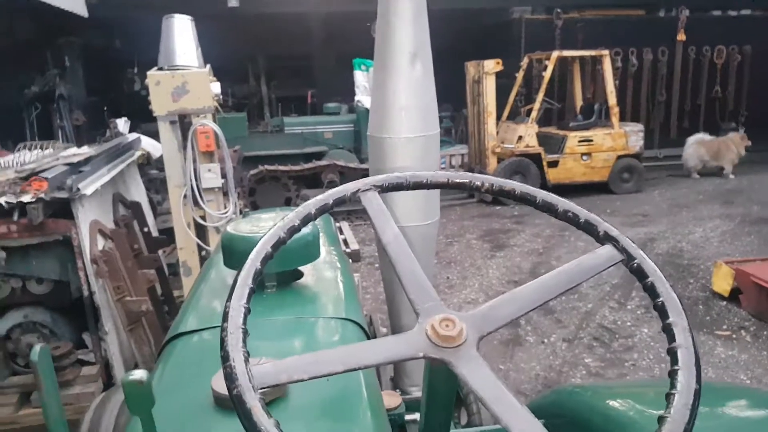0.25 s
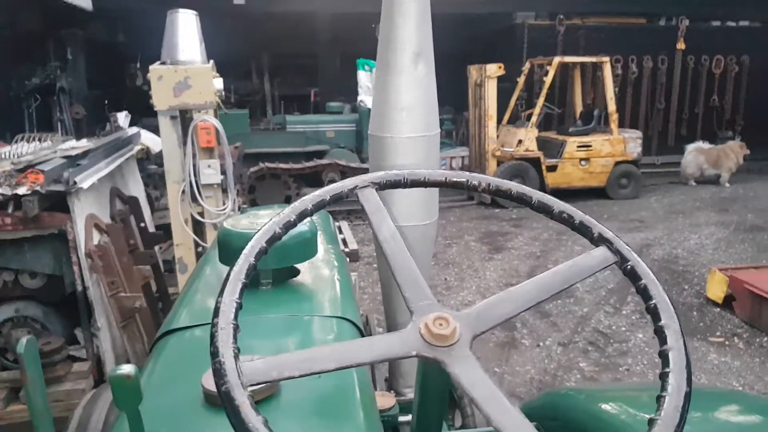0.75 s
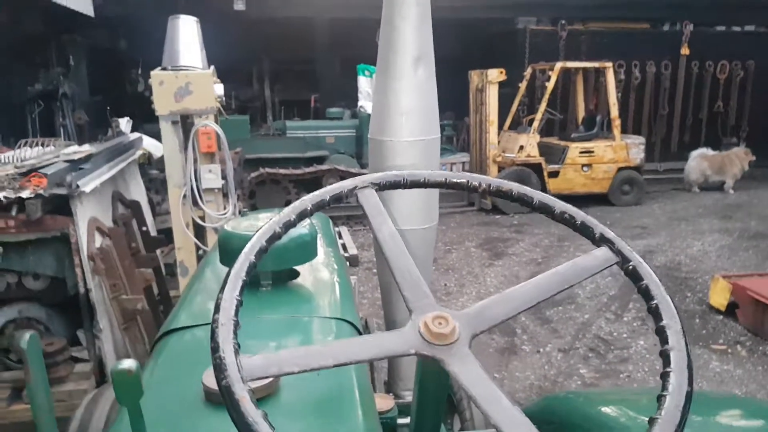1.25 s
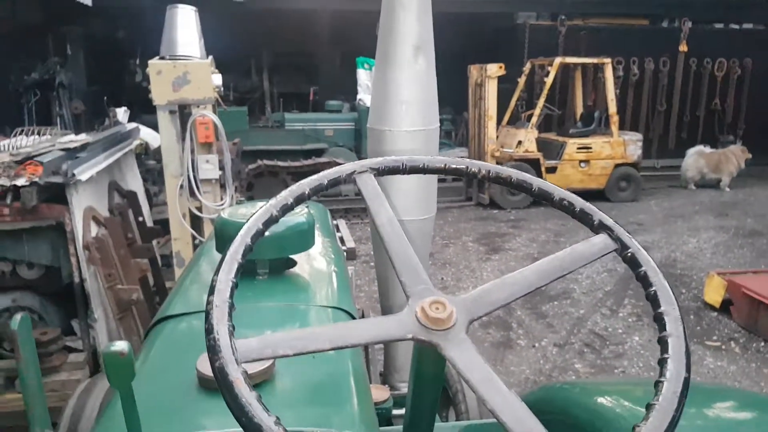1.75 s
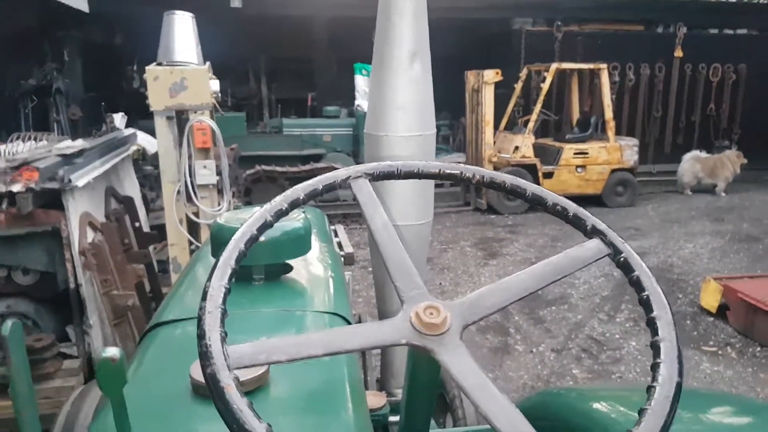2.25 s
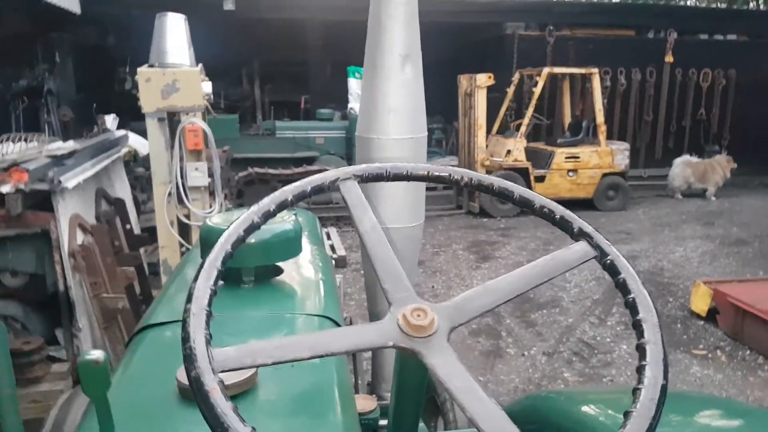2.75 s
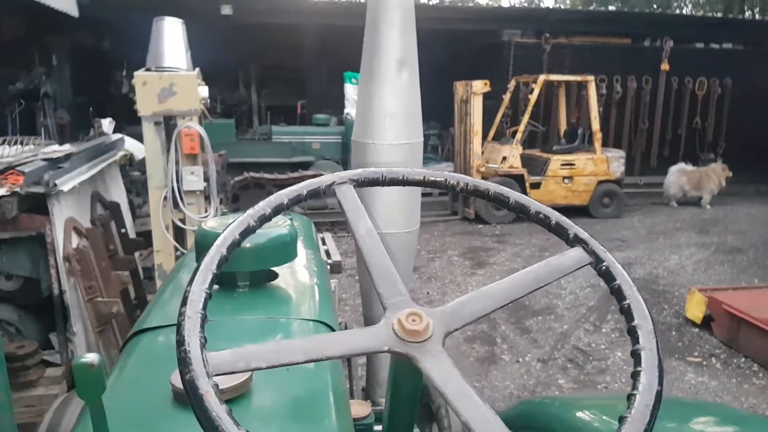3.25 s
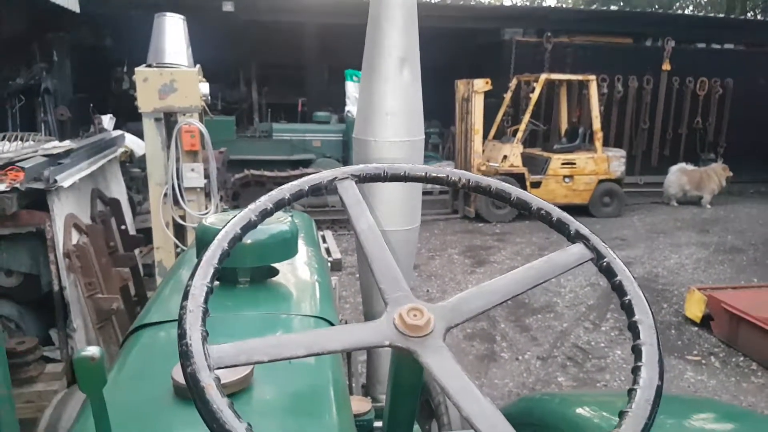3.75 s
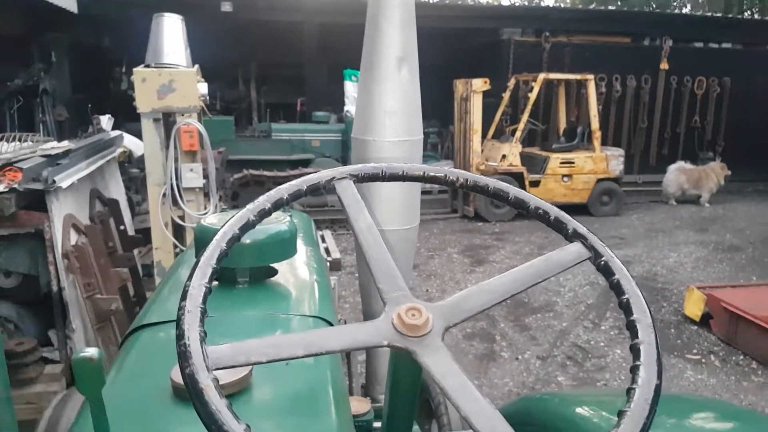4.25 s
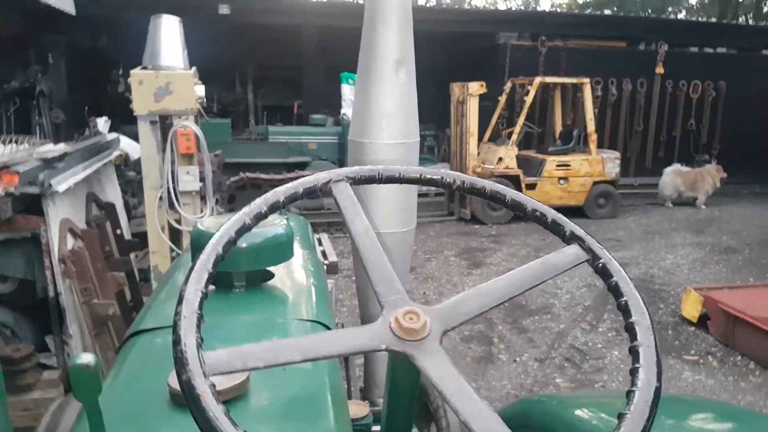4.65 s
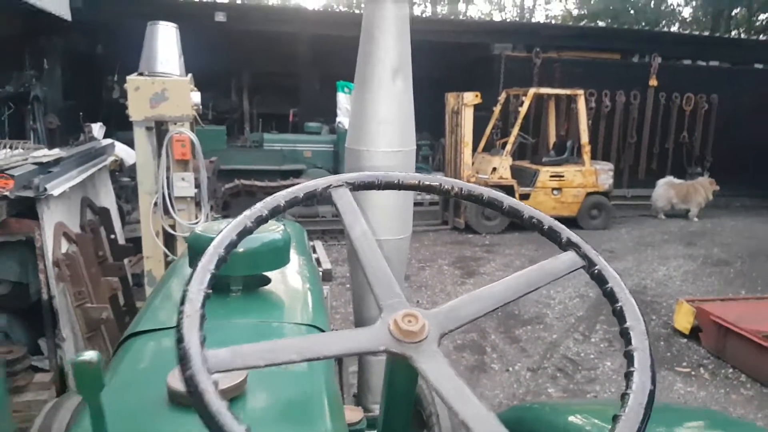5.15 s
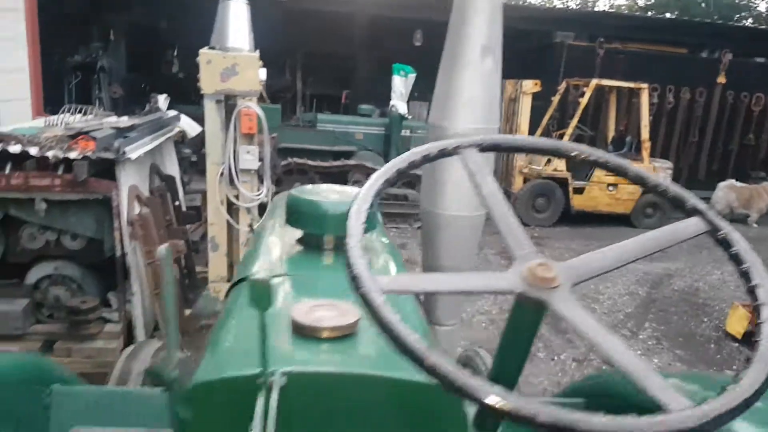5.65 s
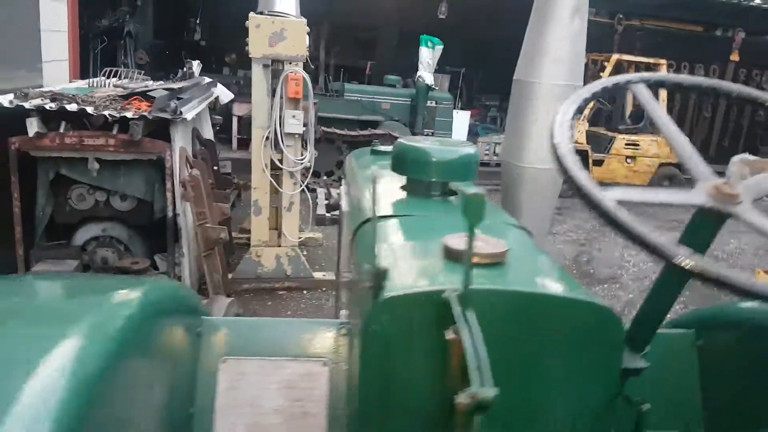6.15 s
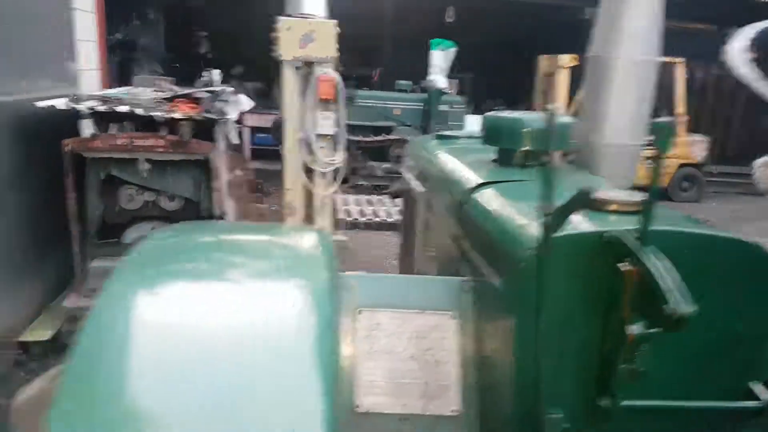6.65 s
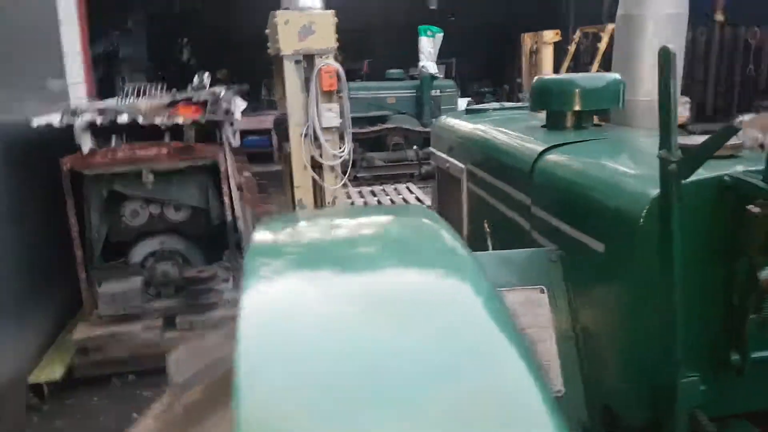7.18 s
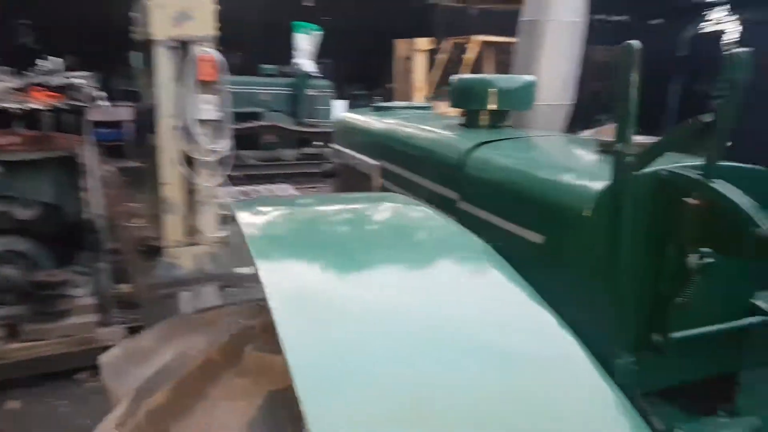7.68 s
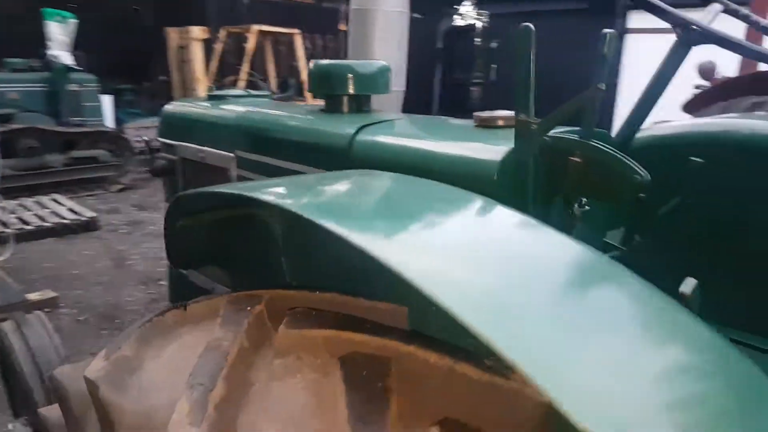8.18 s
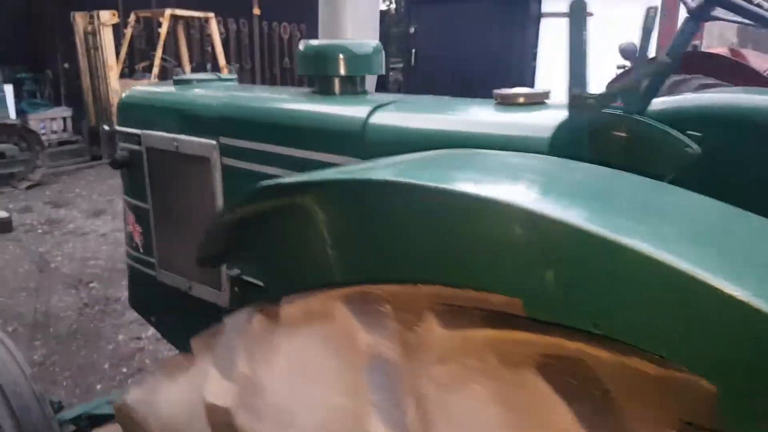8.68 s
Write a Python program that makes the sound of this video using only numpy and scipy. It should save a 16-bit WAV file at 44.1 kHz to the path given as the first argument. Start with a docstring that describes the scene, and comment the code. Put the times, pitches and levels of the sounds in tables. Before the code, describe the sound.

Rapid, even chugging from a big one-cylinder diesel engine at close range: low thuds from the exhaust stack, woody metallic knocks, clatter and pulsing hiss over a low yard rumble. The pace creeps up very slightly. Occasional tiny rattles of loose metal flick past. After about five seconds the handheld stereo viewpoint moves from the driver's seat down to the rear wheel, and the sound turns fuller, with more panel drumming and altered knocks.

```python
"""Dull thuds about eight times a second are heard first: a single-cylinder two-stroke diesel tractor ticks over.
Each firing sends swelling and dying tones up the stack, which return from the walls and sheds of a yard.
Higher tones knock at set delays, loose metal pings and rattles, and filtered noise makes the gas rush and hiss.
Noise also drums the engine's flank and rumbles in the yard. The engine slowly gains speed while the listener
starts at the seat and steps down beside the rear wheel."""
import sys
import numpy as np
from scipy import signal
from scipy.fft import rfft, irfft
from scipy.io import wavfile

SR = 44100
rng = np.random.default_rng(int(sys.argv[2]) if len(sys.argv) > 2 else 0)


def bounce(signal):
    """Save signal as a 16-bit WAV file at the path given by the first command-line argument."""
    frames = np.transpose(np.atleast_2d(signal))
    limited = np.clip(frames, -1, 1)
    pcm = np.round(limited * 32767).astype(np.int16)
    wavfile.write(sys.argv[1], SR, pcm)


N = 393372

# Times when the listener is at each of four places: [t/s]
PLACES_S = [1.2, 4.0, 6.5, 8.2]


def from_db(db):
    """Amplitude ratio: twenty decibels are a factor of ten."""
    return 10 ** (np.asarray(db) / 20)


def at_hz(points, hz):
    """Spectral interpolation: the second column is read linearly against log frequency."""
    points = np.array(points)
    return np.interp(np.log(hz), np.log(points[:, 0]), points[:, 1])


def bin_hz():
    """Discrete Fourier frequencies in Hz, kept at 1 Hz or more for the logarithm."""
    return np.maximum(np.arange(N // 2 + 1) * SR / N, 1)


def drift(rate_hz):
    """Low-pass random process: two equal poles smooth white noise, scaled to spread 1."""
    pole = np.exp(-2 * np.pi * rate_hz / SR)
    smooth = signal.lfilter([1], [1, -2 * pole, pole * pole], rng.standard_normal(N + SR))
    smooth = smooth[SR:]  # drop the filter's start
    return smooth / smooth.std()


def crank():
    """Kinematics: crank speed integrates to an angle in degrees, and each whole turn fires once."""
    # Crank speed: [t/s, speed/(turns per minute)]
    speed = [(0, 480.83), (2, 487.66), (4, 495.71), (6, 503.31), (7.4, 510.0), (9, 509.37)]
    start_turn = .027  # part of a turn since the last firing at time zero
    lead = SR // 10
    t = np.arange(-lead, N + lead) / SR
    turns = np.cumsum(np.interp(t, *np.transpose(speed))) / 60 / SR
    turns = turns - turns[lead] + start_turn
    fired = np.interp(np.arange(int(turns[-1]) + 1), turns, t)
    return 360 * turns[lead:lead + N], fired


def gas(colour, gate_db):
    """Turbulence noise: a gate sets its strength, a spectrum its colour; partly coherent pair, rms 1."""
    # Left-right correlation: [f/Hz, correlation]
    likeness = [(60, 0.91), (130, 0.99), (290, 0.87), (640, 0.9), (1400, 0.067), (3100, 0.074), (6800, .12),
                (15000, 0.055)]
    mid, side = rfft(rng.standard_normal((2, N)) * from_db(gate_db))
    alike = np.clip(at_hz(likeness, bin_hz()), 0, 1)
    pair = np.sqrt(1 + alike) * mid + np.sqrt(1 - alike) * side * [[1], [-1]]
    out = irfft(pair * colour, N)
    return out / out.std()


def yard_rumble():
    """Broadband background: low-frequency noise with a slight random modulation."""
    # Rumble spectrum: [f/Hz, relative level/dB]
    rumble_spectrum = [(15, -59.5), (30, -22.5), (50, -9), (110, -6), (160, 3), (250, 4.5), (330, 1.5),
                       (450, -1), (800, -28), (3000, -110)]
    return gas(from_db(at_hz(rumble_spectrum, bin_hz())), 0.85 * drift(32))


def port_flow(degrees):
    """Periodic flow: crank angle sets the relative strength of rush and hiss in dB."""
    # Gas flow over one turn: [crank angle from firing/degrees, rush level/dB, hiss level/dB]
    port_gates = [(-175, -9.5, -2), (-152, -6, -1.5), (-144, -7, 2.5), (-120, -3, 0.5), (-92, -2, 3),
                  (-78, -3, 2), (-39.5, -3.5, 2.5), (-25, -4, 4), (20, -6.5, 1), (54, -7, 1),
                  (84, -7.5, -1.5), (139, -8.5, -4), (159, -11, -2.5)]
    angle, rush_db, hiss_db = np.transpose(port_gates)
    return [np.interp(degrees, angle, column, period=360) for column in (rush_db, hiss_db)]


def top_hiss(degrees, blow_db, gusts, lumps):
    """Amplitude-modulated noise: a thin treble hiss follows the crank angle and the eddies."""
    # Top hiss spectrum: [f/Hz, relative level/dB]
    top_spectrum = [(4100, -70), (7100, -40), (8700, -12), (9250, -7), (10100, -5), (10850, -1),
                    (11700, -4), (12700, 0), (13400, -3), (14400, -1), (16100, -2)]
    # Top hiss over one turn: [crank angle from firing/degrees, relative level/dB]
    top_gates = [(-175, -5), (-150, -3), (-140, 0), (-95, -1), (-62, 1.5), (-35, -1), (55, -2), (80, -7),
                 (135, -7), (162, -3)]
    gate_db = np.interp(degrees, *np.transpose(top_gates), period=360)
    gate_db = gate_db + .8 * blow_db + .8 * gusts + 1.5 * lumps
    return gas(from_db(at_hz(top_spectrum, bin_hz())), gate_db)


def port_hiss(hiss_db, blow_db, gusts, lumps):
    """Jet noise: turbulence at the ports hisses with the flow and the eddies."""
    # Hiss spectrum: [f/Hz, relative level/dB]
    hiss_spectrum = [(1010, -58), (1720, -25), (2420, -4.5), (3220, -2.5), (4520, -3.5), (5320, -11.5),
                     (6320, -9), (7550, -6.5), (8350, -17), (9100, -26.5), (11100, -59), (16100, -87)]
    gate_db = hiss_db + blow_db + 0.79 * gusts + 0.64 * lumps
    return gas(from_db(at_hz(hiss_spectrum, bin_hz())), gate_db)


def port_rush(rush_db, blow_db, gusts, lumps):
    """Flow noise: lower-pitched turbulence at the ports, with a modulation of its own besides the eddies."""
    # Rush spectrum: [f/Hz, relative level/dB]
    rush_spectrum = [(180, -51), (300, -10.5), (462, -16), (502, -6), (545, -8.5), (788, -7.5), (874, -11),
                     (988, -9), (1270, -13.5), (2370, -20), (3500, -40.5), (4550, -66), (7700, -120)]
    gate_db = rush_db + blow_db + 0.56 * gusts + 0.86 * lumps + 0.69 * drift(150)
    return gas(from_db(at_hz(rush_spectrum, bin_hz())), gate_db)


def engine_flank(rush_db, blow_db):
    """Panel resonance: modulated noise drums the engine's flank at its resonant bands."""
    # Panel resonances: [f/Hz, width at half amplitude/Hz, relative level/dB]
    panel_modes = [(262, 70, -2), (358, 145, -4), (778, 97, -1), (1108, 210, -5), (2610, 120, -24),
                   (3050, 220, -23.5), (5370, 2400, -30)]
    hz = bin_hz()
    panels = sum(from_db(db) / (1 + (2 * (hz - centre) / width) ** 4) for centre, width, db in panel_modes)
    return gas(panels, 0.91 * rush_db + blow_db + 3 * drift(62))


def rattles():
    """Exponential decay: loose parts rattle now and then as dying noise in a band round a pitch."""
    # Rattle events: [t/s, nominal peak level/dB, f/Hz]
    rattle_events = [(0.4429, -32, 4230), (0.7422, -29, 3770), (2.3256, -30, 3680), (2.8384, -26, 4500),
                     (3.034, -32, 3070), (5.4515, -32, 3330), (6.2263, -29.5, 3610), (6.457, -28, 3300),
                     (6.9027, -24, 3210), (6.939, -25, 3600), (7.5153, -30, 3380), (7.8815, -31, 4450),
                     (8.409, -28, 2800), (8.773, -29, 3120)]
    t60_s = 0.08  # time to fall by 60 dB
    out, t = np.zeros((2, N)), np.arange(SR // 10) / SR
    for s, peak_db, hz in rattle_events:
        band = signal.butter(3, [hz / 1.5, hz * 1.6], "band", fs=SR, output="sos")
        buzz = signal.sosfilt(band, rng.standard_normal((2, len(t))))
        # the initial rms lies 4.5 dB under the nominal peak
        buzz = from_db(peak_db - 4.5 - 60 * t / t60_s) * buzz / buzz.std()
        at = round(s * SR)
        out[:, at:at + len(t)] += buzz[:, :N - at]
    return out


def clatter(fired, blow_db):
    """Damped free vibration: loose metal pings while the ports are open, higher pitches dying faster."""
    # Pings of loose metal: [f/Hz, level/dB]
    ping_levels = [(400, -20), (800, -20), (1300, -25), (2000, -29), (2600, -30), (3500, -44), (5000, -50),
                   (7500, -48)]
    count, spread_db = 14, 15.0  # pings a firing, full range of their random levels
    damping = 0.42  # decay time in s is this times hz ** -.6
    out = np.zeros((2, N + 2 * SR))
    draws = rng.random((len(fired), count, 4))
    for firing_s, db, pings in zip(fired, blow_db, draws):
        for when, pitch, size, side in pings:
            hz = 400 * 18 ** pitch
            t = np.arange(round(8 * damping * hz ** -.6 * SR)) / SR
            decay = np.exp(-t * hz ** .6 / damping)
            attack = 1 - np.exp(-t * hz)
            ping = np.sin(2 * np.pi * hz * t) * decay * attack
            # squaring crowds the pings towards the early end; one second of margin
            at = round((1 + firing_s - .052 + .085 * when ** 2.0) * SR)
            gain = from_db(at_hz(ping_levels, hz) + db + spread_db * (size - .5))
            pan = [np.cos(3 * side - .7), np.sin(3 * side - .7)]
            out[:, at:at + len(t)] += gain * np.outer(pan, ping)
    return out[:, SR:SR + N]


def bursts(rows, fired, firing_db, spread_db, jitter_ms):
    """Transient superposition: each firing adds tones that swell and die, random in strength and timing."""
    out = np.zeros(N + 2 * SR)
    for ms, hz, swell_ms, *place_db in rows:
        t = np.arange(round(swell_ms * 18e-3 * SR)) / SR
        u = t * 1000 / swell_ms
        swell = (u * np.e / 2) ** 2 * np.exp(-u)  # reaches 1 at u = 2
        tone = swell * np.sin(2 * np.pi * hz * t)
        level_chance, time_chance = rng.standard_normal((2, len(fired)))
        gains = from_db(np.interp(fired, PLACES_S, place_db) + firing_db + spread_db * level_chance)
        starts_s = 1 + fired + (ms + jitter_ms * time_chance) / 1000  # one second of margin
        starts = np.round(starts_s * SR).astype(int)
        for start, gain in zip(starts, gains):
            out[start:start + len(t)] += gain * tone
    return out[SR:SR + N]


def metal_knocks(fired, knock_db):
    """Impact excitation: ports, pump and sheet metal knock as short tones at set delays from the firing."""
    # Knocks: [onset from firing t/ms, f/Hz, swell time constant/ms, relative level/dB at four places]
    knock_tones = [(-51, 694, 0.62, -11, -21, -21, -14.5), (-51.5, 1660, 1.2, -24, -27, -32, -30),
                   (-48, 558, 1.3, -16.5, -13, -22.5, -30), (-39.5, 1270, 1.16, -27, -23, -22, -20),
                   (-43, 483, 4.7, -19, -20, -28, -35), (-35, 2450, 3.5, -35, -40, -43, -23),
                   (-32, 209.5, 6.4, -24.5, -24, -18, -23), (-33, 348, 2.5, -23, -34, -13.5, -20),
                   (-39.5, 2000, 2.7, -28, -36, -39, -33), (-28.5, 1500, 1.8, -34, -37, -37, -36),
                   (-34, 2200, 2, -48, -48, -46, -43), (-45.5, 7100, 1.8, -54, -54, -50, -41),
                   (-29.5, 4600, 1.8, -50, -52, -48, -44), (-32.5, 779, 2.5, -27.5, -19, -43, -21),
                   (-25.5, 990, 3.2, -11.5, -15, -19.5, -21.5), (-25, 1050, 2.7, -27, -15.5, -22.5, -20),
                   (-19, 253.3, 4.4, -15, -17, -28, -17), (-15, 460, 1.16, -16.5, -11, -18.5, -13.5),
                   (-14.5, 310, 5.56, -14.5, -15, -12, -15.5), (-10.5, 225, 1.35, -4, -5, -7, -12),
                   (2, 259.4, 4.7, -31, -23, -27, -19), (12, 245, 3.5, -17, -15, -21.5, -12),
                   (20, 362, 3.5, -30, -36, -19.5, -28), (22.5, 187, 5, -17, -18, -29, -30),
                   (-1.5, 184, 5.4, -16.5, -17.5, -24, -42), (27.5, 330, 1.12, -20, -15, -21, -25),
                   (31, 970, 2.6, -29, -22, -30, -23.5), (52, 210, 10.6, -22, -19.5, -20.5, -39),
                   (54.5, 295, 4.8, -25.5, -16.5, -19, -17)]
    return bursts(knock_tones, fired, knock_db, spread_db=1.1, jitter_ms=0.21)


def stack_thuds(fired, thud_db):
    """Pulse radiation and reflection: low tones leave the stack and return from walls and sheds."""
    # Pulses and returns: [onset from firing t/ms, f/Hz, swell time constant/ms, relative level/dB at four places]
    pulse_tones = [(-21, 102.5, 12.3, -12.5, -33, -19, -25), (-18.5, 106.5, 5.9, -4.5, -4, -6.5, -10),
                   (-18, 160, 3.2, -16.5, -26, -25, -16.5), (-12.5, 66, 4.7, -21, -20, -30, -44),
                   (-15, 130.3, 26, -27.5, -15.5, -60, -30), (7.5, 115.7, 6.9, -91, -43, -16.5, -15),
                   (10.5, 154.3, 7.8, -11.5, -19.5, -17.5, -36), (14.5, 58, 8.4, -18.5, -15.5, -22.5, -21),
                   (33, 78, 8.4, -26, -24, -38, -45), (35, 117.8, 6.3, -7.5, -7.5, -10.5, -20),
                   (62.5, 104.7, 6.6, -57, -20, -15.5, -22.5), (65, 128.4, 7, -12, -7, -28, -68),
                   (73.5, 80.7, 5.8, -77, -28, -33, -14), (83, 105.4, 11, -36, -14, -16, -11.5)]
    return bursts(pulse_tones, fired, thud_db, spread_db=.7, jitter_ms=.1)


def scene():
    """Linear superposition: noise, metal and thuds add, then the stereo balance follows the listener."""
    # Noise levels: [t/s, rumble level/dB, rush level/dB, hiss level/dB, flank level/dB, top hiss level/dB]
    noise_levels = [(0, -22, -24, -40, -38, -50.5), (3, -22, -23.5, -39.5, -35.5, -50.5),
                    (5.5, -21.5, -23, -39, -33, -49.5), (6.7, -17.5, -22.5, -39.5, -29.5, -50),
                    (7.7, -21, -22.5, -41, -26, -49), (8.92, -21, -21, -39, -21, -48.5)]
    # Strength of the firings: [t/s, thud level/dB, knock level/dB, gas level/dB], all relative
    firing_strength = [(0, -0.5, 0.3, 1.5), (.9, 0.8, .4, 2), (1.25, -1.5, -2.5, -0.1), (1.6, 0.5, .5, 0.8),
                       (2.5, 1.6, 1.3, 1.5), (3.3, 0.5, 0.8, 1.7), (4.1, -0.5, 1, 1.5), (4.9, 0.4, 1.4, 1),
                       (5.5, 2, 3, 1.6), (6.1, 0.5, 0.7, -.5), (6.55, -0.2, -5, 0), (6.95, 2.5, 0.5, 2.5),
                       (7.5, 3, 1.5, -0.5), (7.8, 2, -1, -0.2), (8.2, 2, 1, 0.8), (8.6, 1.5, 2.5, .5),
                       (8.92, 1, -1.5, 0.5)]
    # Random spread from firing to firing: [thud level/dB, knock level/dB, gas level/dB]
    uneven_db = [0.3, 0.66, 0.65]
    # Left minus right at each of the four places: [level/dB]
    turn_db = [0, .1, -.6, -.6]
    t = np.arange(N) / SR
    degrees, fired = crank()

    when, *strength = np.transpose(firing_strength)
    uneven = rng.standard_normal((len(fired), 3)) * uneven_db
    thud_db, knock_db, gas_db = [np.interp(fired, when, c) + u for c, u in zip(strength, uneven.T)]
    blow_db = np.interp(t, fired - .02, gas_db)  # glides between firings, 20 ms ahead of them
    rush_db, hiss_db = port_flow(degrees)
    gusts, lumps = drift(24), drift(163)  # eddies shared by rush, hiss and top hiss

    level_s, *levels_db = np.transpose(noise_levels)
    levels = [from_db(np.interp(t, level_s, column)) for column in levels_db]
    layers = [yard_rumble(),
              port_rush(rush_db, blow_db, gusts, lumps),
              port_hiss(hiss_db, blow_db, gusts, lumps),
              engine_flank(rush_db, blow_db),
              top_hiss(degrees, blow_db, gusts, lumps)]
    noise = sum(level * layer for level, layer in zip(levels, layers))
    metal = rattles() + clatter(fired, gas_db) + metal_knocks(fired, knock_db)
    thuds = stack_thuds(fired, thud_db)
    turn = np.interp(t, PLACES_S, turn_db) / 2
    return (noise + metal + thuds) * from_db([turn, -turn])


def record(dry):
    """Spaced-pair reception: level and arrival time differ by side; peaks are rounded, both ends cut."""
    # Left minus right: [f/Hz, level/dB]
    side_levels = [(60, -2.0), (150, -1.5), (380, -2.0), (600, -3.5), (1200, -6.8), (2380, -5.8),
                   (5980, -6.0), (15000, -4.5)]
    lag_ms = 0.18  # sound reaches the left microphone first
    cutoff_hz = 15720
    hz = bin_hz()
    shade = at_hz(side_levels, hz) / 2
    lag = np.exp(-2j * np.pi * hz * lag_ms / 1000)
    wet = irfft(rfft(dry) * [from_db(shade), from_db(-shade) * lag], N)
    wet = .98 * wet / (1 + wet ** 4) ** .25  # rounds the peaks
    wet = signal.sosfilt(signal.butter(1, 12, "high", fs=SR, output="sos"), wet)
    return signal.sosfilt(signal.ellip(12, .3, 70, cutoff_hz, fs=SR, output="sos"), wet)


dry = scene()
out = record(dry)
bounce(out)
```